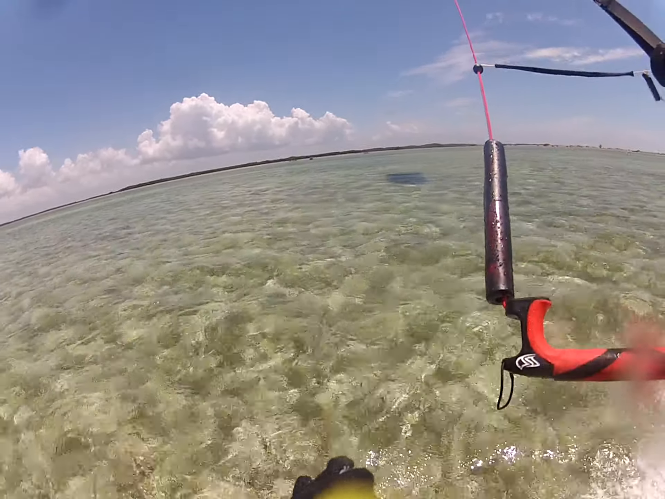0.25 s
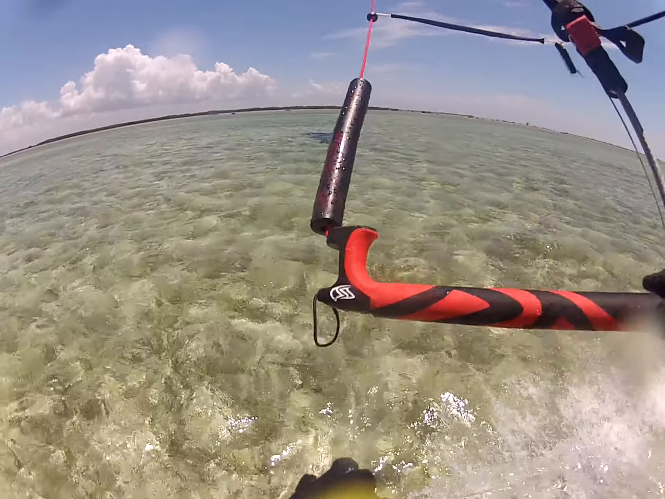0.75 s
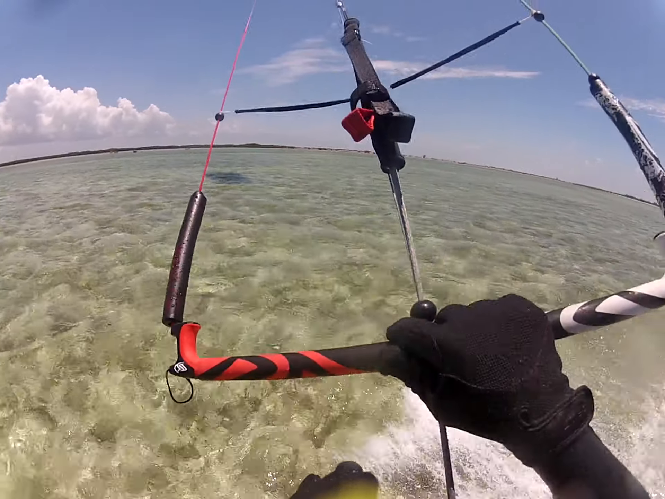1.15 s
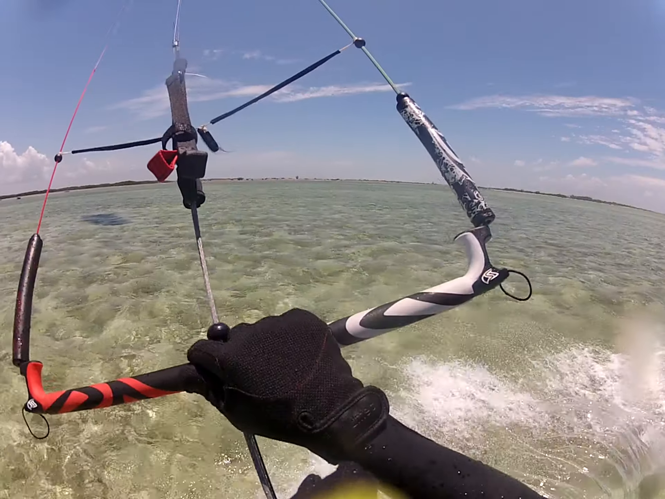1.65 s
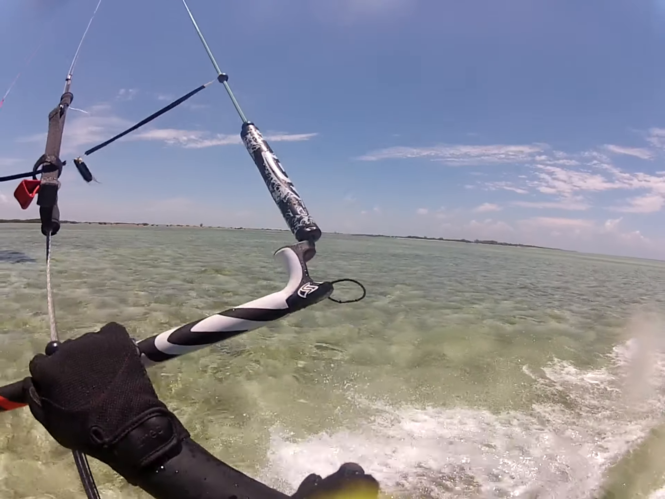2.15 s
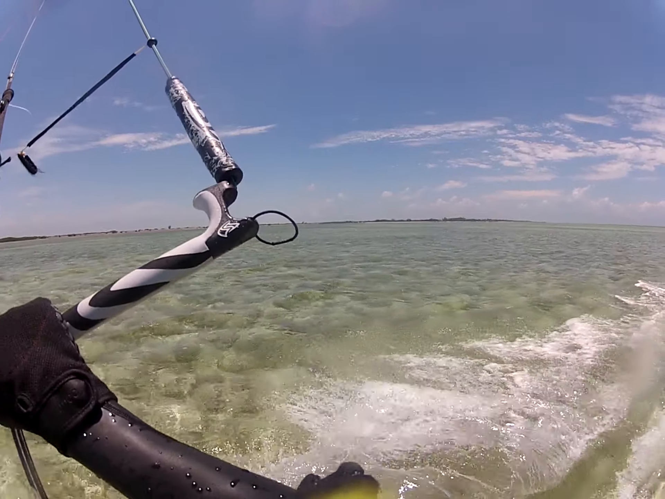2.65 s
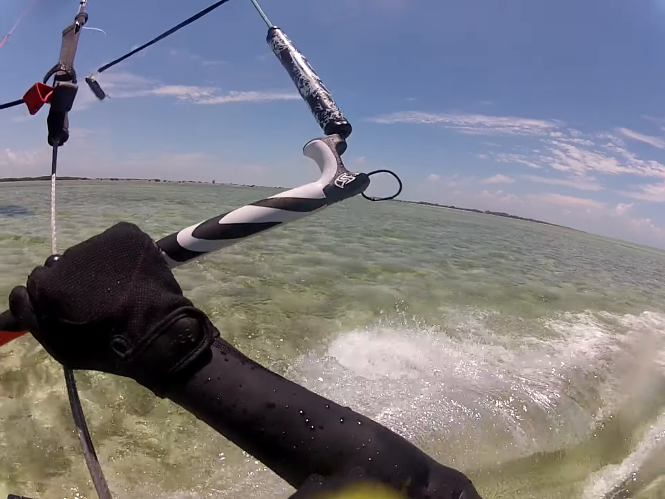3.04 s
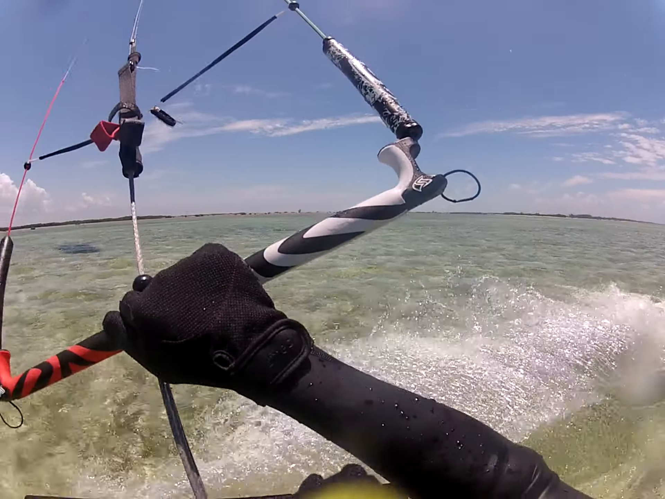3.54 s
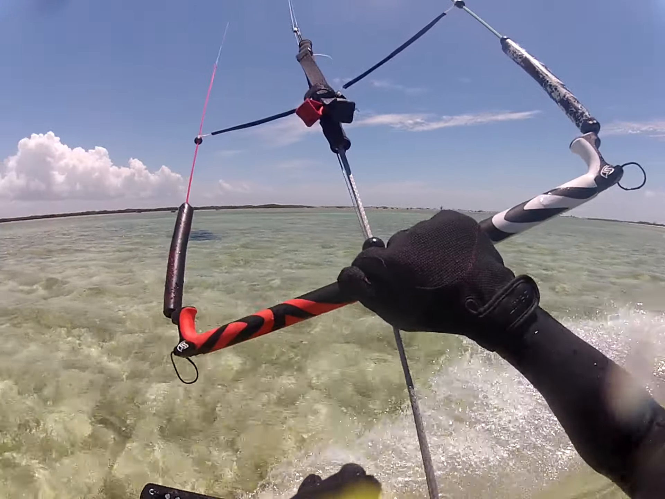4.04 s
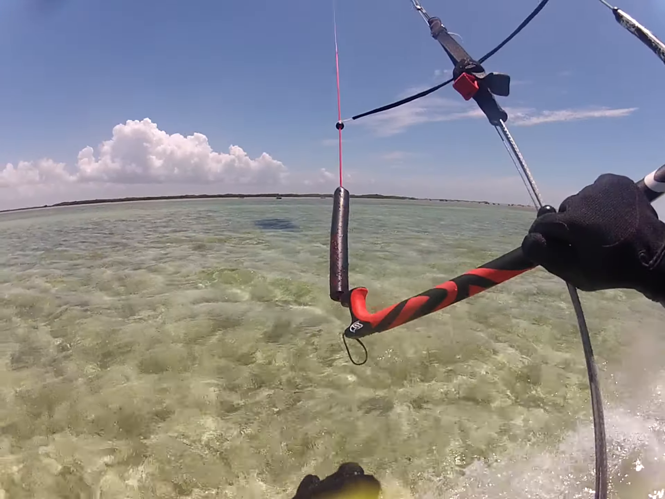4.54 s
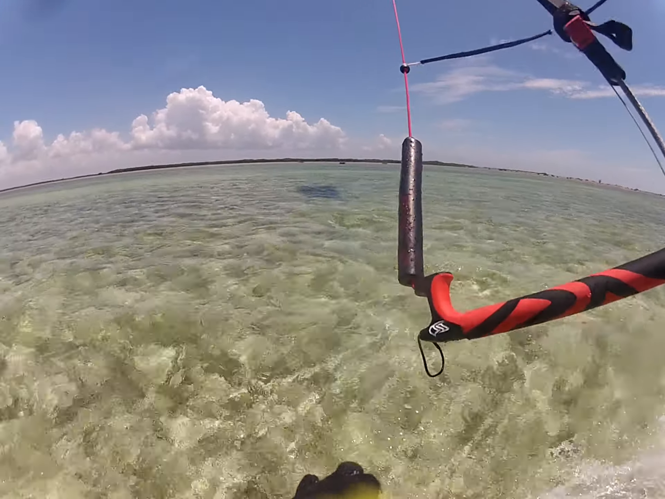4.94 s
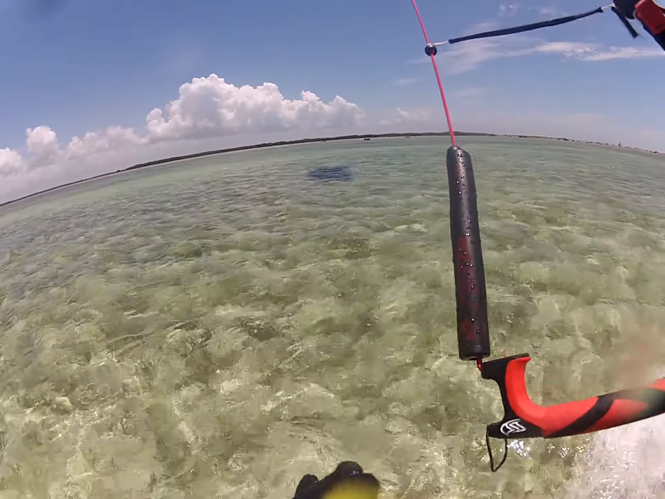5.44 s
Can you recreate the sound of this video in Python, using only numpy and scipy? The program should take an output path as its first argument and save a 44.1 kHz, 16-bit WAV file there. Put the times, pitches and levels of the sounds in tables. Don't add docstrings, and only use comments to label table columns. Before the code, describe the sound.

A kiteboard planes over shallow water, heard close and muffled inside a sealed plastic housing on the rider's head. Throughout, spray makes a hollow, nasal rush, strongest in the upper mids, flickering and surging several times a second; a gritty, low-quality digital fizz lies above it. Underneath, wind buffets the case in soft, deep gusts, strongest near 4 s. Spray starts full, with a hard plastic knock at 0.3 s, then light drop ticks and small watery sloshes until about 1.1 s. From 1.7 to 3.3 s the spray is thinner and dry, short strap clacks come irregularly, loudest around 2.4 s and 3.25 s; at 2.8 s a lump scrapes dully along the shell for under a fifth of a second, ending in a knock. Afterwards knocks become sparse and mostly faint, one clearer at 4.15 s. Spray builds again, fuller after 5 s, with wet sloshes near 5.6 s before the end.

```python
import sys
import numpy as np
from scipy import signal
from scipy.fft import rfft, irfft
from scipy.io import wavfile
from scipy.ndimage import uniform_filter1d, minimum_filter1d

SR = 44100
rng = np.random.default_rng(int(sys.argv[2]) if len(sys.argv) > 2 else 0)


def volts(x):
    e = np.asarray(x, float) / 20
    return 10 ** e


def generate_wav(sig):
    pcm = np.round(np.clip(np.atleast_2d(sig).T, -1, 1) * 32767).astype(np.int16)
    wavfile.write(sys.argv[1], SR, pcm)


N = 251260
TIME = np.arange(N) / SR
CHIP_HZ, HOLD_SAMPLES = 12000, 4
USUAL_SPRAY_DB = -53

# time_s, spray_db, turn_db
SPRAY = [(0, -50, 7), (.3, -52.5, 1), (.55, -55, 1.5), (.9, -53.5, 0.5), (1.3, -55, -1), (1.65, -53.5, 2),
         (1.95, -58.5, 2), (2.4, -56.5, 1.5), (2.75, -56.5, -1), (3.05, -57.5, 0.5), (3.35, -54, -3),
         (3.85, -56, -2), (4.1, -53.5, -4), (4.5, -51.5, -2.5), (4.85, -54.5, -2), (5.2, -50, -1),
         (5.42, -51, 1.5), (5.7, -51.5, 1.5)]
# peak_s, rise_s, fall_s, lift_db
SHEETS = [(.01, .03, 0.056, 1), (.16, .06, 0.095, 6), (.7, 0.069, 0.11, 2.5), (.84, 0.036, 0.037, 3),
          (1.04, 0.073, 0.19, 4.5), (1.2, 0.083, .06, 3), (1.58, 0.077, 0.091, 4.5), (1.72, .04, 0.11, 1.5),
          (2.2, 0.07, 0.1, 1.5), (2.6, 0.056, 0.08, 3.5), (2.88, 0.092, .1, 0.5), (3.22, 0.14, 0.086, 1.5),
          (3.55, .03, .06, 1.5), (4.25, 0.16, 0.16, 5), (4.6, 0.043, 0.088, 1), (5.0, .05, 0.055, 1.5),
          (5.12, .05, .08, 1), (5.3, 0.1, 0.035, 0.5), (5.6, 0.055, 0.11, 4.5)]
# time_s, lift_db
WAKE = [(0, 0.5), (.5, -1), (1.1, 2.5), (1.5, -0.5), (2.0, 1.5), (2.4, 2), (3.0, 2.5), (3.9, -2),
        (4.3, -0.5), (4.85, -0.5), (5.4, -0.5), (5.7, -0.5)]
# usual_level_db, swell_share, turn_share, sheet_share
RUSH_FOLLOWS = (USUAL_SPRAY_DB, 1, 0, 1)
HOLLOW_FOLLOWS = (-60.5, 0.22, -0.5, 0.74)
THIN_FOLLOWS = (-56, 0.45, 0.84, .9)
FAR_FOLLOWS = (-63.5, 0.34, 0.49, 0.92)
WASH_FOLLOWS = (-59.5, 0.4, -.2, 0.26)
# centre_hz, width_hz, level_db
HOLLOW_MODES = [(809, 50, 1.5), (1028, 172, 0.5), (1255, 220, -12.5)]
RUSH_MODES = [(1850, 215, 1.5), (2237, 344, -2), (2542, 183, -7.5)]
THIN_MODES = [(2872, 580, -5), (3495, 314, -1.5)]
FAR_HISS_MODES = [(3970, 320, -3.5), (4572, 320, 0), (5310, 750, -4.5)]
# freq_hz, density_db_per_hz
WASH_COLOUR = [(76, -73), (130, 10.5), (385, 5), (751, 0.5), (818, -34), (1220, 8), (1490, -2),
               (1700, -0.5), (2210, -50), (3740, -120)]

# time_s, level_db
WIND = [
    (0.0, -53),
    (0.8, -49.5),
    (1.6, -49),
    (2.3, -47.5),
    (3.1, -49),
    (4.0, -45.5),
    (4.4, -50),
    (5.0, -49),
    (5.7, -50.5),
]
# peak_s, lift_db
GUSTS = [(0.32, 8), (.75, -6.5), (.84, 1.5), (1.0, 5.5), (1.13, 0), (1.19, 1.5), (1.3, 5), (1.55, -11),
         (1.73, 5.5), (1.98, -10), (2.05, 7), (2.25, 1), (2.45, 5.5), (2.51, -5), (2.57, 6), (2.78, 8),
         (3.05, 8.5), (3.23, 6), (3.5, 4), (3.85, -1), (4.3, -4), (4.49, 7.5), (4.57, 5), (4.67, -1),
         (4.7, 4), (4.78, 5), (5.22, 9), (5.27, -5), (5.63, 4.5), (5.69, 8)]
# freq_hz, density_db_per_hz
WIND_COLOUR = [(7.1, 12), (12, -11), (43, 0.5), (64, 2), (80, -0.5), (107, -9.5), (145, -22.5),
               (220, -26.5), (290, -40), (480, -120)]

# peak_s, build_up_s, run_off_s, dull_db, bright_db
SLOSH = [(0.19, 0.14, 0.029, -52.5, -1), (0.546, 0.079, .03, -53, 4.5), (1.027, 0.026, 0.02, -52.5, 6),
         (1.085, 0.048, 0.082, -49, -7), (1.73, 0.065, .02, -54, -11), (2.078, 0.024, .05, -57, -4),
         (2.666, 0.05, 0.025, -55.5, 2.5), (3.308, 0.018, 0.068, -54, -12), (3.4, .02, 0.018, -57, -19),
         (5.57, 0.032, 0.027, -56.5, 10), (5.69, 0.045, .03, -58, -8)]
# centre_hz, width_hz, level_db
SLOSH_MODES = [(327, 250, -3), (436, 66, 4), (575, 115, -5), (756, 260, -14)]
# time_s, dull_db, bright_db
DRAG = [
    (2.77, -62, 3),
    (2.784, -51, 0.5),
    (2.814, -43.5, -0.5),
    (2.886, -51, 2.5),
    (2.918, -52, 6),
    (2.94, -48, 4),
]
# centre_hz, width_hz, level_db
DRAG_MODES = [(380, 300, -10), (554, 61, 3.5), (740, 320, -10), (1480, 100, -11)]

# start_s, peak_db, deep_lean_db, bright_db, bright_centre_hz
KNOCKS = [(0.283, -20, 1, -10, 2000), (0.2865, -39, 7, -8, 1900), (0.888, -44, 5, -21, 1960),
          (1.703, -42.5, -14, -15, 2190), (1.806, -26.5, 0, -22.5, 2370), (2.034, -24.5, 2.5, -21, 1850),
          (2.183, -25.5, 2, -24, 1730), (2.29, -39, 2, -18, 1830), (2.412, -16.5, 2, -19, 2000),
          (2.427, -32, -2, -19, 1730), (2.5588, -29, -10, -7, 1930), (2.726, -34, 2.5, -19, 1860),
          (2.929, -35, 10, -4, 1830), (2.942, -21.5, 1.5, -19, 1890), (3.245, -19.5, 0, -22, 2370),
          (3.266, -31, 0.5, -19, 1830), (4.156, -28, 0.5, -13, 1910), (4.42, -40.5, -6, -20, 1990),
          (4.431, -41.5, 0, -9, 2040), (4.7373, -39, -1, -14, 1780), (4.961, -40.5, 3, -19, 1900),
          (5.674, -47.5, 6, 5, 2020), (3.251, -36, 4, -11, 1900), (2.419, -40, 2, -18, 1900)]
# start_s, peak_db, deep_lean_db, bright_db, top_db
DROPS = [(0.325, -50, 5, 0, -11), (0.486, -52.5, -9, 4, 5), (0.623, -49, -5, -7, -5),
         (0.831, -49, -13, -4, -5), (0.85, -45, -13, -5, 7.5), (2.5547, -41, 2, -16, -24),
         (2.896, -52, 2, -2, 6), (2.91, -38, 5, -8, -6), (3.035, -45.5, 3, -14, -14), (3.23, -47, 5, 0, -6),
         (3.5378, -53, 0, 13.5, 13.5), (3.553, -55, 0, -3, 10), (4.658, -48, 0, -4, -6),
         (4.969, -51.5, 2, 6, 14.5), (5.245, -53, 1, 0, 10.5), (5.57, -55, 0, 1, 8),
         (0.92, -48, 9, -7, -10)]
# start_s, peak_db, pitch_hz, t60_s
BUMPS = [
    (0.539, -37.5, 526, 0.014),
    (2.069, -45, 346, 0.022),
    (4.683, -39.5, 360, 0.021),
]
# freq_hz, t60_s, level_db
SHELL_MAIN = [(830, 0.071, -10.5), (947, 0.022, 3.5), (1047, 0.019, 8), (1181, 0.027, 6)]
SHELL_BRIGHT = [(1733, 0.024, -7), (1860, .018, -1.5), (2067, 0.019, -2.5), (2325, 0.017, 3)]
SHELL_LOW = [(447, 0.025, -2.5), (524, 0.024, -2.5)]
SHELL_TOP = [(3470, .011, 0), (3200, .008, -8), (4550, .01, -12)]

# low_hz, high_hz, cell_hz, lost_share, loudness_tie
LOST_CELLS = [(5350, 5850, 70, 0.04, .8), (5700, 6300, 94, .66, 0.5), (6280, 6750, 55, 0.34, 0),
              (10770, 11050, 170, 0.3, 1.0), (11040, 11750, 230, 0.7, 0.9), (11360, 12400, 230, 0.6, 1.0),
              (12500, 13100, 170, 0.4, 1.0), (13200, 13800, 120, 0.1, 1.0), (14350, 15200, 700, .72, 0),
              (14980, 17500, 2300, 1, 0)]


def level(x, db):
    return x * volts(db) / np.sqrt(np.mean(x ** 2))


def curves(table):
    time_s, *columns = np.transpose(table)
    return [np.interp(TIME, time_s, column) for column in columns]


def swell(peak_s, rise_s, fall_s):
    return np.interp(TIME, [peak_s - rise_s, peak_s, peak_s + fall_s], [0, 1, 0])


def walk(rate_hz):
    hold = int(SR / rate_hz)
    steps = np.repeat(rng.standard_normal(N // hold + 1), hold)
    return 1.06 * uniform_filter1d(uniform_filter1d(steps, hold), hold)[:N]


def colour(x, points):
    hz, db = np.transpose(points)
    f = np.maximum(np.fft.rfftfreq(N, 1 / SR), 1)
    shape_db = np.interp(np.log(f), np.log(hz), db, left=-90, right=-90)
    return irfft(rfft(x) * volts(shape_db), N)


def follow(rule):
    usual_db, swell_share, turn_share, sheet_share = rule
    spray_db, turn_db = curves(SPRAY)
    sheet_db = sum(lift_db * swell(s, rise_s, fall_s) for s, rise_s, fall_s, lift_db in SHEETS)
    swell_db = swell_share * (spray_db - USUAL_SPRAY_DB)
    return usual_db + swell_db + turn_share * turn_db + sheet_share * sheet_db


def droplets(rate_hz, spread_db):
    hit = rng.random(N) < rate_hz / SR
    size = np.minimum(rng.exponential(size=N), 3.5)
    sign = np.sign(rng.standard_normal(N))
    return level(hit * volts(spread_db * size) * sign, 0)


def resonate(x, hz, width_hz):
    return signal.lfilter(*signal.iirpeak(hz, hz / width_hz, SR), x)


def cavity(drive, modes, flicker_db):
    total = np.zeros(N)
    for k, (hz, width_hz, db) in enumerate(modes):
        rung = resonate(resonate(drive, hz, 1.25 * width_hz), hz, 1.8 * width_hz)
        total += (-1) ** k * volts(db + flicker_db * walk(30)) * rung
    return level(total, 0)


def spray():
    drive = rng.standard_normal(N) + volts(-5.5) * droplets(1500, spread_db=2.0)
    hollow = volts(follow(HOLLOW_FOLLOWS)) * cavity(drive, HOLLOW_MODES, 1.5)
    rush = volts(follow(RUSH_FOLLOWS)) * cavity(drive, RUSH_MODES, 1.2)
    thin = volts(follow(THIN_FOLLOWS)) * cavity(drive, THIN_MODES, 1.2)
    near = volts(0.34 * walk(22.4)) * (hollow + rush + thin)
    far_db = follow(FAR_FOLLOWS) + curves(WAKE)[0] + 3.5
    return near + volts(far_db) * cavity(rng.standard_normal(N), FAR_HISS_MODES, 1.0)


def wash():
    drive = rng.standard_normal(N) + volts(-5.0) * droplets(250, spread_db=5.0)
    return level(colour(drive, WASH_COLOUR), 2.3) * volts(follow(WASH_FOLLOWS) + 1.97 * walk(24.65))


def wind():
    gust_db = sum(db * swell(s, rise_s=0.033, fall_s=0.044) for s, db in GUSTS)
    return level(colour(rng.standard_normal(N), WIND_COLOUR), 0.035) * volts(curves(WIND)[0] + gust_db)


def slosh():
    drive = droplets(1200, spread_db=2.0) + volts(-0.5) * rng.standard_normal(N)
    bright = cavity(drive, HOLLOW_MODES + RUSH_MODES + THIN_MODES, 3.5)
    lumps = cavity(drive, SLOSH_MODES, 0.51)
    dragged = cavity(drive, DRAG_MODES, 0.65)
    out = np.zeros(N)
    for s, rise_s, fall_s, db, bright_db in SLOSH:
        out += swell(s, rise_s, fall_s) * volts(db) * (lumps + volts(bright_db) * bright)
    dull_db, bright_db = curves(DRAG)
    fade = np.clip(np.minimum(TIME - DRAG[0][0], DRAG[-1][0] - TIME) / 0.0087, 0, 1)
    return out + fade * volts(dull_db) * (dragged + volts(bright_db) * bright)


def ring(modes, push, chance, rise_s):
    t = np.arange(int(0.12 * SR)) / SR
    free = np.zeros(len(t))
    for k, (hz, t60_s, db) in enumerate(modes):
        decay = np.exp(-np.log(1000) * t / t60_s)
        pitch_hz = hz * (1 + 0.012 * chance[2 * k + 1])
        free += volts(db + 0.41 * chance[2 * k]) * decay * np.sin(2 * np.pi * pitch_hz * t)
    struck = np.convolve(free * (1 - np.exp(-t / rise_s)), push)[:len(t)]
    high_pass = signal.butter(N=3, Wn=0.67 * modes[0][0], btype="high", fs=SR, output="sos")
    struck = signal.sosfilt(high_pass, struck)
    return struck / np.max(np.abs(struck))


def contact():
    contact_ms = 1.66
    push = np.zeros(SR // 50)
    beats_s = np.arange(8) / SHELL_MAIN[1][0]
    still_touching = np.clip(contact_ms - 1000 * beats_s + 1, 0, 1)
    push[(beats_s * SR).astype(int)] = 0.83 ** np.arange(8) * still_touching
    return push


def add(out, start_s, sound):
    i = int(start_s * SR)
    out[i:i + len(sound)] += sound


def knocks():
    out = np.zeros(N + SR)
    push = contact()
    tap = push[:1]
    # top_db, bright_rise_s
    blows = [(*row, -15, 0.0006) for row in KNOCKS]
    blows += [(s, db, lean_db, bright_db, 1900, top_db, 0.0018) for s, db, lean_db, bright_db, top_db in DROPS]
    chance = rng.standard_normal((len(blows), 4, 8))
    for (s, db, lean_db, bright_db, bright_hz, top_db, rise_s), c in zip(blows, chance):
        main = [(hz, t60_s, g + lean_db * (1 - k / 0.66)) for k, (hz, t60_s, g) in enumerate(SHELL_MAIN)]
        bright = [(hz, t60_s, g - 6 * ((hz - bright_hz) / 330) ** 2) for hz, t60_s, g in SHELL_BRIGHT]
        blow = ring(main, push, c[0], 0.00061)
        blow = blow - volts(bright_db + 6.5) * ring(bright, tap, c[1], rise_s)
        blow = blow + volts(-18) * ring(SHELL_LOW, push, c[2], 0.0036)
        blow = blow + volts(top_db) * ring(SHELL_TOP, tap, c[3], 0.0021)
        add(out, s - 0.0004, -volts(db + 1.5) * blow)
    for s, db, hz, t60_s in BUMPS:
        add(out, s, volts(db) * ring([(hz, t60_s, 0)], np.ones(1), np.zeros(2), 0.00098))
    return out[:N]


def scene():
    return (spray() + wash() + wind() + slosh() + knocks())[None]


def chip(dry):
    low_pass = signal.butter(N=6, Wn=min(5600, CHIP_HZ / 2), fs=SR, output="sos")
    slow = signal.resample_poly(signal.sosfilt(low_pass, dry), CHIP_HZ, SR, axis=1)
    return signal.resample_poly(np.repeat(slow, HOLD_SAMPLES, axis=1), SR, CHIP_HZ * HOLD_SAMPLES, axis=1)


def drop_weak(x):
    f, _, z = signal.stft(x, SR, nperseg=2048, noverlap=1024)
    power = np.abs(z) ** 2 + 1e-18
    rush = power[(f > 1500) & (f < 10000)].mean(axis=0)
    rush = minimum_filter1d(rush, size=5)
    for lo_hz, hi_hz, cell_hz, share, tied in LOST_CELLS:
        count = max(round((hi_hz - lo_hz) / cell_hz), 1)
        edges = np.searchsorted(f, np.linspace(lo_hz, hi_hz, count + 1))
        cells = np.log(np.add.reduceat(power[:edges[-1]], edges[:-1], axis=0)) - tied * np.log(rush)
        keep = cells > np.quantile(cells, np.clip(share, 0, 1))
        z[edges[0]:edges[-1]] *= np.repeat(keep, np.diff(edges), axis=0)
    return signal.istft(z, SR, nperseg=2048, noverlap=1024)[1]


def top_cut(x):
    return signal.sosfilt(signal.butter(12, 16390, fs=SR, output="sos"), x)


def record(dry):
    held = chip(dry)
    mix = drop_weak(held[0])[None, :N]
    return top_cut(mix)


dry = scene()
out = record(dry)
generate_wav(out)
```